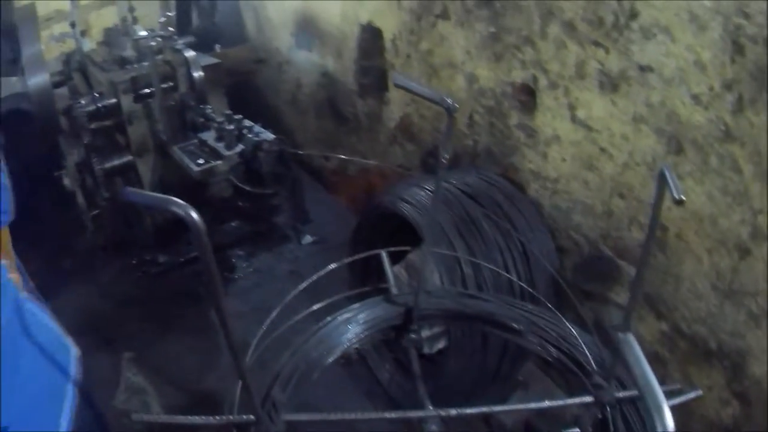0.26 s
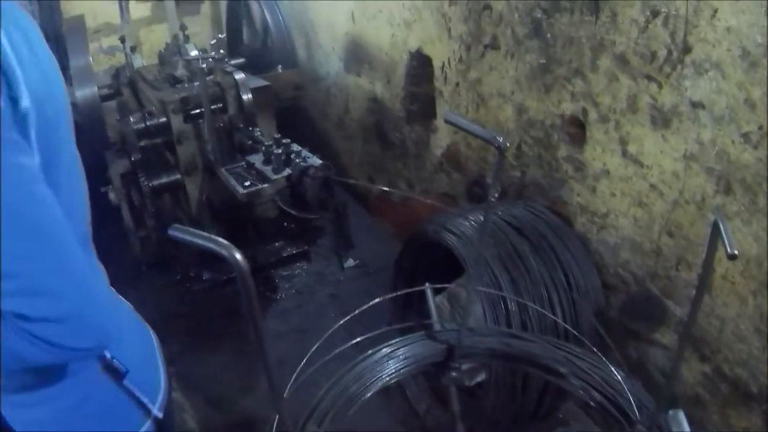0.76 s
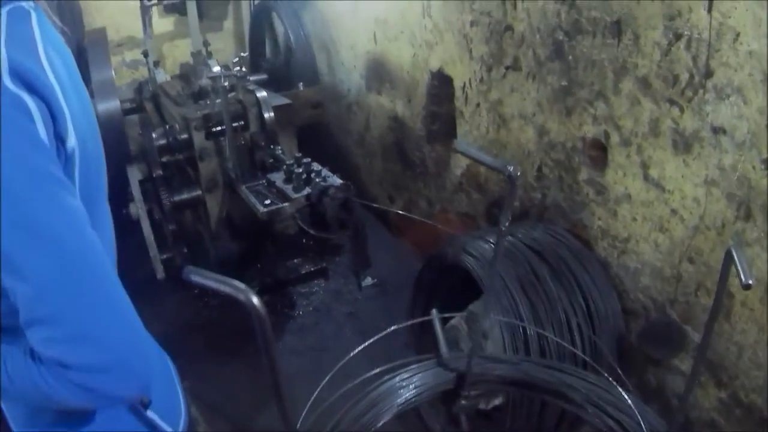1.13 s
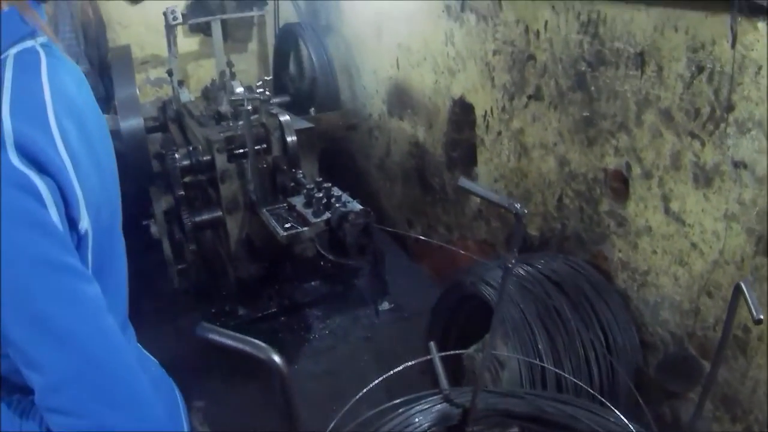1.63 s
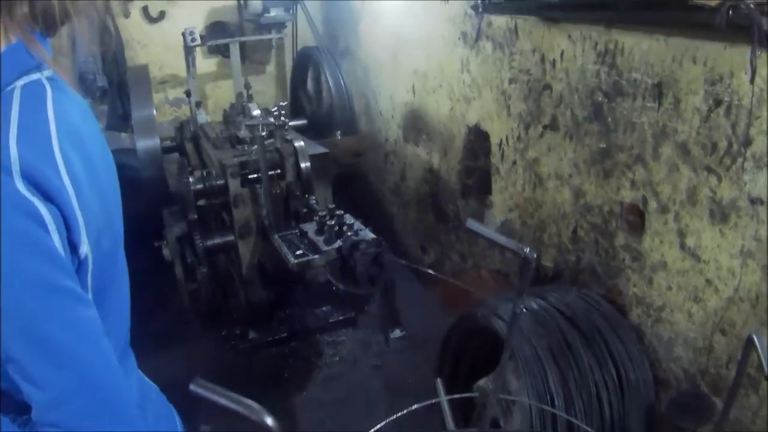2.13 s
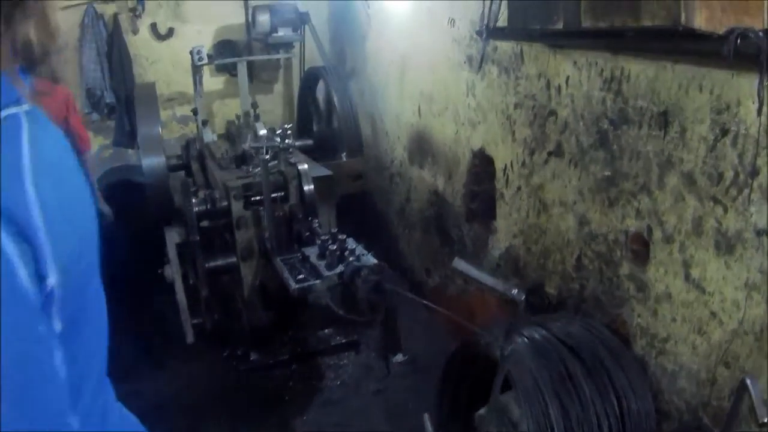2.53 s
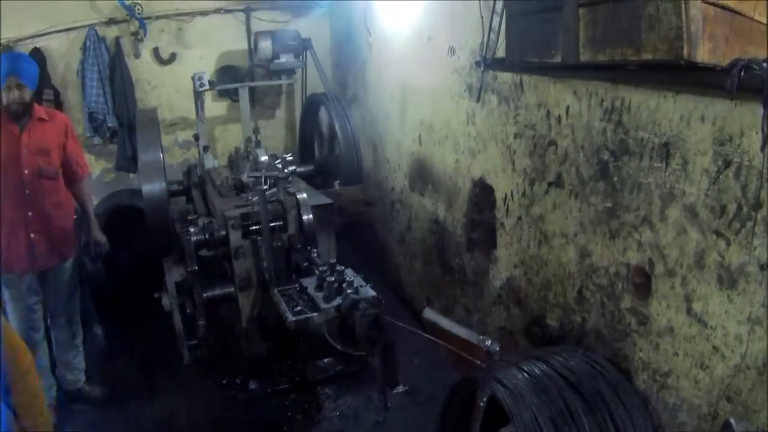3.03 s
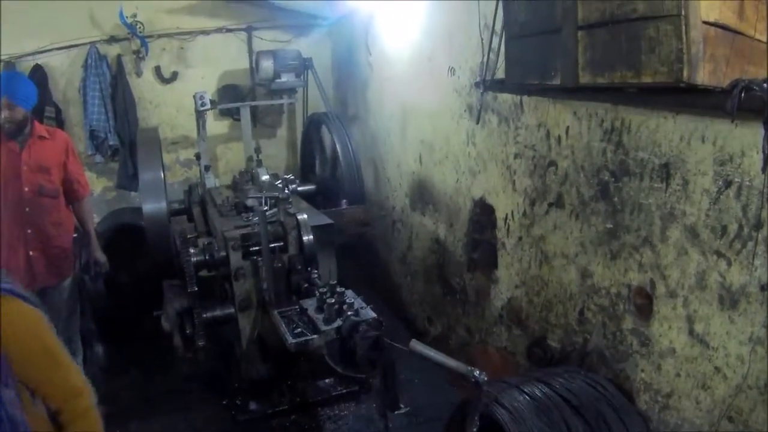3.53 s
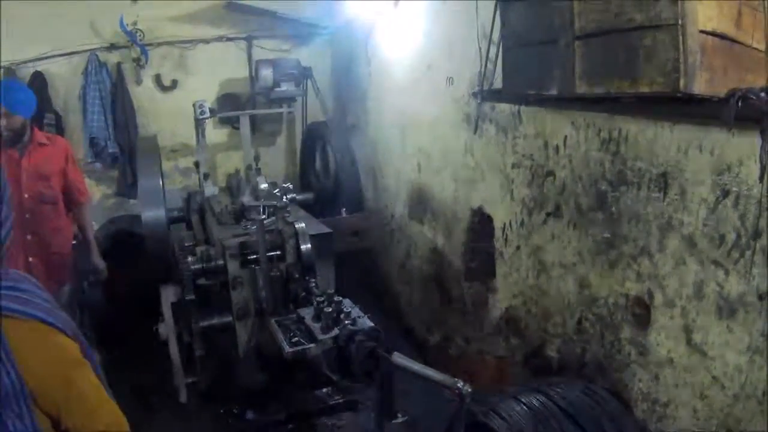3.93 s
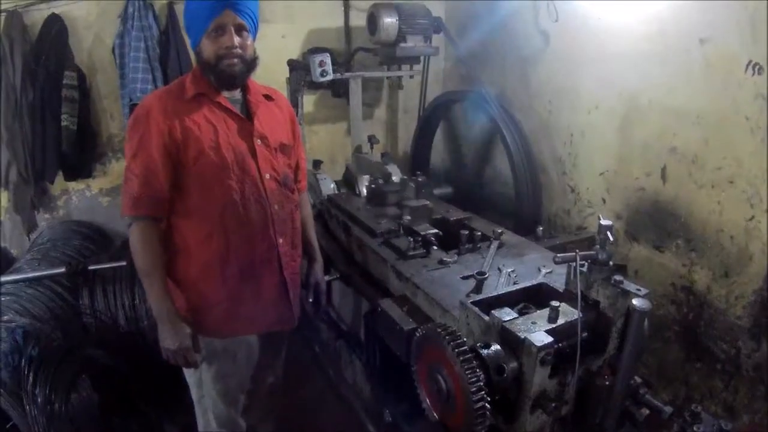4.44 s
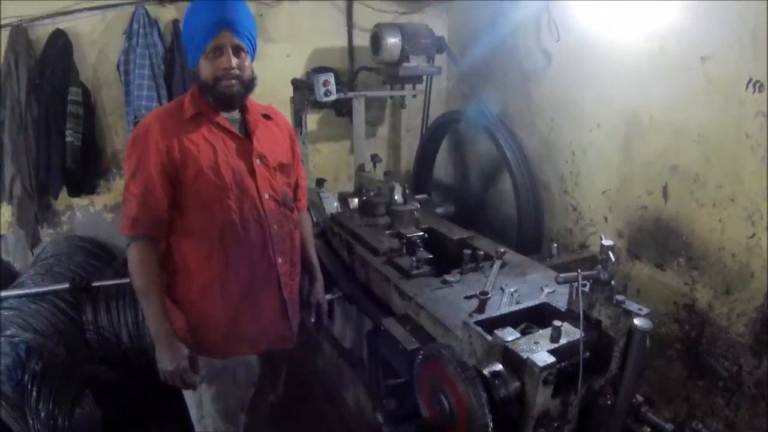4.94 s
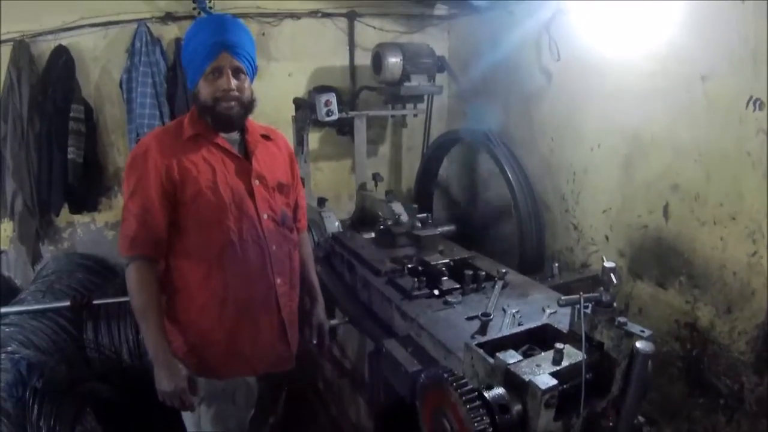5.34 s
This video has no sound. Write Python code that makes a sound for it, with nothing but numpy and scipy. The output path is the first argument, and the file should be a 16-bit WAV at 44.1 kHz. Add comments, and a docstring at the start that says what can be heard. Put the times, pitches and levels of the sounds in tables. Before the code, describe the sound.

In a small bare-walled workshop, a wire-working machine runs steadily. Sharp steel clacks, ringing punches and heavier ram thuds repeat in a turn of about one and a half seconds, over continuous gear rattle. Just after four seconds a cut skips part of a turn and the level drops, recovering partly. A hand-held phone picks it up, with occasional dull finger taps, short echoes and low rumble.

```python
"""In a small hard-walled workshop, a wire-fed double-stroke header clatters near a hand-held phone.
Its parts clack in much the same order each turn: bursts of noise crack and ring the steel tooling.
Ram strokes shake the cast frame and its bed plate, and the gears rattle in a pattern every turn.
About four seconds in, a cut in the sound skips part of a turn; the level drops and comes part way back.
Echoes, a low rumble and faint hiss lie behind; fingers tap the phone case now and then."""
import sys
import numpy as np
from scipy import signal
from scipy.fft import rfft, irfft, next_fast_len
from scipy.io import wavfile
from scipy.ndimage import uniform_filter1d

SR = 44100
rng = np.random.default_rng(int(sys.argv[2]) if len(sys.argv) > 2 else 0)


def persist_wave(psi):
    """Save psi, clipped to +-1, as 16-bit WAV."""
    counts = np.round(np.clip(psi, -1, 1) * 32767).astype(np.int16)
    wavfile.write(sys.argv[1], SR, np.atleast_2d(counts).T)


N = 246519  # length in samples
JUMP_S = 4.066  # when a cut in the sound skips part of a turn

# Moving parts, roughly in the order of a turn: (low, middle, high ring [Hz], their three levels [dB],
# dull crack level [dB], bright crack level [dB], t60 [s] before limits, first snap level [dB],
# bounce delay [s] before limits, bounce level [dB]); t60 is the time to fade by 60 dB
CUTTER = (2300, 6270, 8140, -5, 2, -8, -7, -16, 0.17, 7, .03, -5)
CUTTER_BACK = (4340, 6280, 9300, 9, 12, -15, 5, 0, 0.35, -2, .021, -6)
FINGER = (4000, 5750, 7830, -15, -12, -13, -8.5, 3.5, 0.3, 1, 3, 1)
LATCH = (4000, 6950, 8700, -32, -1, 5, -10, 0, 0.22, -1, 0.7, -1.5)
PUNCH_1 = (3000, 6300, 8900, -6, -3, -6, -4, -7, -0.02, 5.5, .03, -28)
FEED = (3430, 7603, 9650, -18, -13, -6, 0, -0.5, 0.7, 2, -4, -1)
PAWL = (4020, 5100, 9000, -2, -7, 15, -2, 5.5, 0.46, 7, -0.5, -4)
CLIP = (3998, 7747, 8900, -9, 4.5, 6, -33, 2, 0.3, -5, 2, -12)
PUNCH_2 = (4050, 6950, 7850, -18, -6, -3, -5.5, 2, 0.3, -7, .03, -16)
EJECT = (4050, 6348, 8850, -14, 7, -9, -1, -0.5, 0.09, 2.5, -1.7, 0)
EJECT_BACK = (4200, 7230, 9700, -10, -4, -28, -9, -6, 0.27, 3, 0.8, 0)
# The second punch as it sounds after the cut, same columns
PUNCH_2_ASIDE = (4052, 6950, 7957, -20, 2, 6, -9, 3, 0.32, 9, .021, -18)
# Small sounds outside that order, same columns
PING = (4340, 6280, 9280, -5, 0.1, 15, -31, -14, 0.2, -6, .02, -20)
SLIDE = (3000, 4010, 4340, -9, 0, -18, -13, 4, -0.26, 3, 0.7, 0)
TICK = (4020, 5100, 14700, -10.5, -1.2, 5, -15, 4, 0.02, -8, .02, -20)
THIN_PING = (3900, 7850, 13450, -4, 0.1, 16, -3, -12, 0.02, -6, .02, -20)
# The second blow of the first punch, same columns
PUNCH_1_AGAIN = (4340, 6300, 10800, 0, -5, -5, 5.5, -1, 0.18, 5, .03, -15)
# Steel hitting steel: (time [s], level [dB], part)
CLACKS = [(0.0847, -13, CUTTER), (0.1226, -24, PING), (0.2803, -17.5, FINGER), (0.2825, -33, PING),
          (0.412, -26, PAWL), (0.449, -13.5, LATCH), (0.4798, -8, PUNCH_1), (0.4935, -14.5, PUNCH_1_AGAIN),
          (0.6186, -30, PAWL), (0.68, -25, SLIDE), (0.7194, -35, THIN_PING), (0.7475, -16, FINGER),
          (1.004, -39, TICK), (1.091, -31.5, TICK), (1.1752, -7.5, PUNCH_2), (1.334, -20, SLIDE),
          (1.362, -12, EJECT), (1.4088, -8.5, EJECT_BACK), (1.5437, -12, CUTTER),
          (1.5677, -24, CUTTER_BACK), (1.744, -11, FINGER), (1.8177, -23, CLIP), (1.905, -15, LATCH),
          (1.926, -10.5, PUNCH_1), (1.943, -16, PUNCH_1_AGAIN), (2.111, -21, FEED), (2.4056, -20.5, CLIP),
          (2.424, -28, CLIP), (2.5181, -33, PAWL), (2.5786, -17, FINGER), (2.628, -10.5, PUNCH_2),
          (2.6865, -22, SLIDE), (2.7514, -22, SLIDE), (2.81, -12, EJECT), (2.8671, -8.5, EJECT_BACK),
          (2.9872, -9, CUTTER), (3.012, -28.5, CUTTER_BACK), (3.1825, -14, FINGER), (3.192, -23, SLIDE),
          (3.358, -15.5, LATCH), (3.379, -11, PUNCH_1), (3.396, -14.5, PUNCH_1_AGAIN), (3.425, -26.5, PAWL),
          (3.564, -15.5, FEED), (3.758, -25, PAWL), (4.0428, -19, FEED), (4.136, -16, CUTTER_BACK),
          (4.1881, -25.5, PING), (4.304, -16.5, FINGER), (4.339, -11.5, FINGER), (4.508, -11, CLIP),
          (4.536, -7, PUNCH_1), (4.549, -13, PUNCH_1_AGAIN), (4.603, -30, PING), (4.714, -14, FEED),
          (4.92, -22, PAWL), (5.1003, -24, PAWL), (5.235, -11, PUNCH_2_ASIDE), (5.415, -5.5, EJECT),
          (5.443, -12.5, FEED), (5.4687, -6.5, EJECT_BACK)]


def read_clacks():
    """Unpack each clack, keeping its fade and its bounce delay within sensible limits."""
    clacks = []
    for s, level_db, part in CLACKS:
        *struck, dull_db, bright_db, t60, snap_db, bounce, bounce_db = part
        struck_hz, struck_db = np.reshape(struck, (2, 3))
        crack_db = level_db + np.array([dull_db, 0, bright_db, bright_db])  # one per band
        t60, bounce = max(t60, .01), np.clip(bounce, .005, .03)
        clacks.append((s, level_db, struck_hz, struck_db, crack_db, t60, snap_db, bounce, bounce_db))
    return clacks


# Pitches at which the tooling rings: (frequency [Hz])
TOOLING_HZ = [2300, 3000, 3430, 3880, 4020, 4340, 5150, 5750, 6280, 6770, 6965, 7250, 7530, 7830, 8140,
              8800, 9280, 9600, 10200, 10800, 13450, 14720]
# Strength and fade of those rings, in the same order: (level [dB], t60 [s])
TOOLING = [(-7.5, 0.053), (-15.5, 0.072), (-4, 0.05), (-11.5, 0.1), (-11, 0.089), (-11, 0.065),
           (-2.5, 0.018), (-7.5, 0.05), (-10.5, 0.021), (-14, 0.053), (-2, 0.012), (-13, 0.078),
           (-6, 0.065), (-10, 0.091), (-11, 0.078), (-14, 0.015), (-8, 0.025), (-14, 0.034), (-18, 0.046),
           (-12.5, 0.029), (-8, 0.044), (-3, 0.057)]
RING_DB = -12.5
PAIR_SPLIT = 0.013  # each tooling mode has a twin this share higher


def tooling_rings(rattle):
    """A blow and a burst of contacts ring each steel mode, most strongest near the struck part's pitches."""
    hz, (db, t60) = np.array(TOOLING_HZ), np.transpose(TOOLING)
    local = hz[:, None] < 10000  # higher modes ring only when struck close by
    force, blow = np.zeros((len(hz), N)), np.zeros((len(hz), N))
    luck = rng.standard_normal((len(CLACKS), len(hz)))
    for clack, chance in zip(read_clacks(), luck):
        s, level_db, struck_hz, struck_db, _, decay, _, bounce, bounce_db = clack
        distance = np.log(hz[:, None] / struck_hz) / 0.019
        near = np.exp(-distance ** 2) @ undb(struck_db)
        everywhere = undb(-20.0 + 0.7 * chance) * local[:, 0]
        share = undb(level_db + db + RING_DB) * (near + everywhere)
        add(force, s, .010, 0.73 * decay, share)
        blow[:, int(s * SR)] = share * undb(3.5)
        blow[:, int((s + bounce) * SR)] = share * undb(3.5 + bounce_db)  # the part bounces once
    force += rattle * undb(db[:, None] - 15.5) * local
    rings = np.zeros(N)
    for f, b, h, fade in zip(force, blow, hz, t60):
        # a blow takes some milliseconds to build its ring
        drive = chatter(30, 2.8) * f + ring(b, h, .02)
        rings += ring(drive, h, fade) - undb(-9.0) * ring(drive, h * (1 + PAIR_SPLIT), fade)
    return rings


# Tone colour of cracking steel: (frequency [Hz], level [dB per Hz])
CRACK = [(1100, -26), (1700, -13.5), (2300, 3), (2680, -5), (3050, -1), (3650, -2.5), (4000, 1), (4650, -2),
         (5600, -3.5), (7090, -2), (9500, -7), (10700, -10), (11800, -20.5), (15700, -15)]
CRACK_DB = -21


def cracks(rattle):
    """Many tiny steel contacts make a broad crack; a sharp snap marks the first contact and the bounce."""
    crack, snap = np.zeros((4, N)), np.zeros((4, N))
    for s, _, _, _, crack_db, decay, snap_db, bounce, bounce_db in read_clacks():
        colours = undb(crack_db + CRACK_DB)
        add(crack, s, .013, decay, colours)
        add(snap, s, .006, .045, colours * undb(snap_db))
        add(snap, s + bounce, .005, .045, colours * undb(snap_db + bounce_db))
    contacts = colour(chatter(120, 1.76), CRACK)
    contacts = contacts + undb(-6.5) * jingle(count=1800, low_hz=2398, high_hz=15190, t60=0.088,
                                              scatter_db=12.5, spectrum=CRACK)
    contacts = contacts + undb(-10.0) * jingle(count=600, low_hz=4960, high_hz=14750, t60=0.083,
                                               scatter_db=7.5, spectrum=CRACK)
    contacts = patchy(contacts, size=512, width_hz=260, hold_s=.025, depth_db=4.5)
    crack = crack * [flicker(24.57, depth_db) for depth_db in (0.85, 2.2, 2.1, 2.3)]
    gear_contacts = rattle * undb([[-7.0], [-7.0], [-7.0], [-10.5]])
    # equal first edges leave the second band silent
    cracking = (crack + gear_contacts) * split(contacts, 6800, 6800, 14000)
    snaps = snap * split(colour(rng.standard_normal(N), CRACK), 7500, 7800, 13000)
    return undb(2.0) * np.sum(snaps, axis=0) + np.sum(cracking, axis=0)


# How a stroke or knock shakes the frame: (rise [s], t60 [s], bass level [dB] before STROKE_BASS_DB)
FIRST = (0.061, 0.4, -15)
SECOND = (0.055, 0.39, -15.5)
RECOIL = (0.029, 0.42, -17)
KNOCK = (0.044, 0.52, -41)
# The two strokes as they sound after the cut, same columns
FIRST_ASIDE = (0.072, 0.42, -8)
SECOND_ASIDE = (0.046, 0.48, -8.5)
# Ram strokes and their after-knocks: (time [s], level [dB], kind)
STROKES = [(0.0, -25.5, RECOIL), (0.519, -13, FIRST), (0.61, -25.5, RECOIL), (0.75, -31, KNOCK),
           (1.243, -8, SECOND), (1.359, -25, RECOIL), (1.549, -35, KNOCK), (1.973, -13.5, FIRST),
           (2.24, -32, KNOCK), (2.334, -33, KNOCK), (2.701, -11, SECOND), (2.809, -25, RECOIL),
           (3.419, -13.5, FIRST), (3.528, -25, RECOIL), (3.759, -52, KNOCK), (4.575, -14.5, FIRST_ASIDE),
           (4.659, -33, RECOIL), (5.298, -13, SECOND_ASIDE), (5.37, -31, RECOIL), (5.449, -34, KNOCK)]
STROKE_DB, STROKE_BASS_DB = -15, 13
# Single hard knocks on the frame: (time [s], level [dB])
KNOCKS = [(0.083, -22), (0.28, -22), (0.475, -19), (0.527, -11), (0.538, -18), (0.612, -23), (0.75, -27),
          (1.247, -12), (1.384, -22), (1.407, -21), (1.469, -21), (1.578, -19), (1.946, -20.5),
          (1.979, -20), (2.336, -19), (2.502, -25), (2.667, -17), (2.713, -11), (2.737, -21), (3.34, -33),
          (3.426, -15), (3.528, -23), (3.709, -31), (3.762, -22), (4.537, -27), (4.552, -20), (4.574, -13),
          (4.602, -19), (4.624, -19), (5.305, -16), (5.356, -18), (5.383, -19)]
KNOCK_RISE_S, KNOCK_T60_S, KNOCK_RMS_DB = 0.0013, 0.05, -17
# Tone colour of the cast frame: (frequency [Hz], level [dB per Hz])
FRAME = [(35, -27), (60, -22.5), (119, -18), (201, -14), (281, -7.5), (432, -10), (720, -8), (844, -8.5),
         (1050, -5.5), (1450, 1), (2130, -8), (2340, -11.5), (2700, -21.5), (3510, -17.5), (5940, -120)]
# Low modes of the bed plate: (frequency [Hz], level [dB], t60 [s])
BED = [(119.3, -20.5, 0.49), (274, -23, 0.12), (731, -19, 0.077), (1088, -7.5, 0.025), (1160, -22.5, 0.18),
       (1444, -16, 0.13), (1686, -13.5, 0.097)]
ASIDE_BED_DB = -10.5  # the lowest bed mode is weaker after the cut


def frame(rattle_db, bright_db):
    """The casting has too many modes to tell apart, the bed plate a few; strokes shake both."""
    shake = np.zeros((2, N))  # bass, and everything above
    for s, level_db, (rise, decay, bass_db) in STROKES:
        bands_db = np.array([bass_db + STROKE_BASS_DB, 0])
        add(shake, s, rise, decay, undb(level_db + STROKE_DB + bands_db))
    for s, level_db in KNOCKS:
        add(shake[1], s, KNOCK_RISE_S, KNOCK_T60_S, undb(level_db + KNOCK_RMS_DB))
    shake = shake * [flicker(45, 1.8), flicker(70, 1.0)]  # each stroke lands as several uneven knocks
    knocks = chatter(180, 1.18)
    covers = jingle(count=500, low_hz=600.0, high_hz=2379, t60=0.089, scatter_db=2.5, spectrum=FRAME)
    casting = colour(knocks, FRAME) + undb(-6.5) * covers
    casting = patchy(casting, size=1024, width_hz=90, hold_s=.09, depth_db=1.27)
    bass, middle, upper = split(casting, 760, 1090)
    aside = undb(ASIDE_BED_DB * (np.arange(N) > JUMP_S * SR))
    plate = np.zeros(N)
    for hz, db, t60 in BED:
        push = knocks * shake[int(hz > 500)] * (aside if hz < 200 else 1)
        plate += undb(db) * ring(push, hz, t60)
    bands = [bass, middle + undb(bright_db) * upper]
    gear_shake = undb(rattle_db + np.array([[-3.0], [-1.5]]))
    return plate + np.sum((shake + gear_shake) * bands, axis=0)


# Hard first contacts that sing short and high: (time [s], level [dB], ring [Hz])
PINGS = [(0.0857, -12.5, 6290), (0.1052, -13.5, 6290), (0.282, -21, 9320), (0.4499, -12, 6950),
         (0.4798, -15, 6300), (0.493, -15, 6300), (0.494, -19, 10700), (4.549, -21, 10700),
         (4.517, -25, 7900), (1.178, -8.5, 6940), (1.3663, -17, 6350), (1.5693, -17, 6230),
         (1.906, -13, 6930), (1.9184, -17, 6900), (2.6314, -17, 6830), (2.814, -18, 6620),
         (2.9896, -25, 6180), (3.0134, -17, 6210), (3.379, -9, 6250), (3.3974, -20, 6300),
         (4.1554, -21, 6340), (4.5356, -10.5, 6290), (5.237, -9, 7960)]
PING_RISE_S, PING_T60_S, PING_RMS_DB = 0.0035, 0.039, -10.5


def pings():
    """Hard steel contacts ring as very short pairs of close tones."""
    events = [(s + PING_RISE_S / 2, hz, db + PING_RMS_DB) for s, db, hz in PINGS]
    return beating_tones(events, PING_RISE_S, PING_T60_S)


# Single parts that ring out clearly: (time [s], ring [Hz], level [dB])
CLINKS = [(.120, 4310, -33.5), (.254, 3000, -44), (.285, 14800, -42), (.362, 3910, -40), (.430, 3930, -46),
          (.635, 14800, -50), (.703, 3910, -31), (.764, 4030, -45), (.804, 3430, -41), (1.339, 2990, -40),
          (1.386, 3000, -38), (1.453, 3080, -36), (1.507, 3880, -47), (1.549, 2384, -34.5),
          (1.644, 4320, -38), (1.689, 3880, -37), (1.735, 13400, -40), (1.81, 14550, -52.5),
          (1.82, 2990, -38), (1.861, 2980, -38), (1.957, 4300, -36), (1.96, 3480, -34), (1.98, 2350, -39),
          (2.406, 3980, -40), (2.522, 4330, -43), (3.001, 3870, -36), (3.052, 2950, -47),
          (3.101, 3420, -39), (3.154, 5100, -42), (3.195, 2980, -36), (3.207, 4000, -28),
          (3.245, 3010, -40.5), (3.341, 1920, -36.5), (3.567, 3400, -37), (3.683, 1927, -35),
          (3.759, 2390, -35), (4.155, 3850, -32), (4.36, 7750, -38), (4.538, 1940, -32.5),
          (4.555, 1920, -31), (4.552, 3900, -28), (4.719, 1930, -29), (4.733, 3910, -34),
          (4.927, 1940, -28), (5.04, 1930, -30.5), (5.319, 3030, -32), (5.411, 1930, -24),
          (5.42, 5160, -26), (5.422, 4320, -37), (5.493, 3020, -40)]


def clinks():
    """Single steel parts ring as pairs of close tones that fade a little more slowly than the pings."""
    return beating_tones(CLINKS, rise=0.0082, t60=0.09)


# Parts that keep ringing roughly while shaken: (time [s], ring [Hz], level [dB], shaking t60 [s])
SINGS = [(.09, 8200, -41, 0.26), (.125, 6250, -36, 0.36), (.3, 4000, -42.5, .6), (.62, 7600, -36, .2),
         (.52, 4340, -34, .3), (.62, 3900, -42, 0.62), (1.33, 3000, -38, 0.53), (1.55, 4320, -33, .4),
         (1.56, 3930, -39, 0.46), (2.675, 3020, -32, 0.3), (2.681, 3910, -35, 0.24),
         (2.755, 3030, -35, 0.41), (2.819, 3960, -38, 0.31), (2.84, 3070, -35, 0.65),
         (2.925, 3000, -39, 0.26), (3.02, 6280, -36, 0.35), (3.02, 4350, -39, .4), (3.2, 3030, -39, .5),
         (3.41, 6340, -39, 0.34), (4.15, 4340, -42, .3), (4.355, 7850, -38, .5), (4.55, 3930, -40, .5),
         (4.56, 6260, -39, .4), (5.25, 3950, -36, .3), (5.26, 7040, -38, .4), (4.2, 2230, -39, .4),
         (4.3, 3070, -43, 0.7), (4.35, 1667, -28.5, .4), (4.37, 3900, -43, .5), (4.7, 3950, -42, .6),
         (4.92, 3920, -41, 0.98), (4.92, 1500, -32, .6), (5.04, 3900, -39, .5)]
SING_RISE_S, SING_RING_S = 0.0096, 0.046


def sings():
    """Bursts of rattle, made of noise, drive one narrow mode each."""
    out = np.zeros(N)
    for s, hz, db, t60 in SINGS:
        push = np.zeros(N)
        add(push, s, SING_RISE_S, t60, undb(db))
        end = min(int((s + t60 + SING_RING_S) * SR), N)
        span = slice(int((s - SING_RISE_S) * SR), end)
        noise = rng.standard_normal(2 * SR)[:span.stop - span.start]
        out[span] += ring(push[span] * noise, hz, SING_RING_S)
    return out


# Ringing of a guard plate: (frequency [Hz], level [dB], t60 [s])
GUARD = [(3900, -15, 0.02), (4054, -18.5, 0.022), (3005, -25, .07)]


def guard_plate(rattle):
    """The gear rattle keeps a guard plate ringing in a few modes."""
    return rattle * sum(undb(db) * ring(chatter(15, 6.9), hz, t60) for hz, db, t60 in GUARD)


# Gear rattle through one turn: (time into the turn [s], frame level [dB], tooling level [dB])
RATTLE = [(0.0, -31.5, -30), (0.3, -33.5, -31.5), (0.47, -35, -33), (0.68, -34.5, -33),
          (0.85, -31.5, -32.5), (1.05, -38, -40), (1.19, -39, -41), (1.26, -37.5, -28.5), (1.34, -34, -31),
          (1.41, -29.5, -21)]
TURN_S, SKIP_S = 1.453, .303


def gear_rattle(t):
    """The gears rattle by the same pattern every turn; a cut skips part of one."""
    turn = (t + SKIP_S * (t > JUMP_S)) % TURN_S
    return curves(RATTLE + [(TURN_S, *RATTLE[0][1:])], turn)  # the end joins the start


# Finger taps on the phone: (time [s], level [dB] before TAP_DB)
TAPS = [(1.821, -41), (2.589, -25), (3.253, -19), (3.378, -20.5), (3.809, -39), (4.03, -32), (4.065, -30)]
TAP_DB = 28


def taps():
    """Short pushes on the phone case, heard as dull ticks."""
    push = np.zeros(N)
    for s, level_db in TAPS:
        push[int(s * SR)] = undb(level_db + TAP_DB)
    return signal.sosfilt(signal.butter(2, (120, 1100), "band", fs=SR, output="sos"), push)


ROOM_T60_S, ROOM_DB = 0.71, -10.5


def room(x):
    """Dense echoes from the bare walls, duller as they die."""
    t = np.arange(int(ROOM_T60_S * SR)) / SR
    noise = rng.standard_normal(len(t))
    dull = signal.sosfilt(signal.butter(1, 3000, fs=SR, output="sos"), noise)
    bright = (noise - dull) * undb(-40 * t / ROOM_T60_S)  # the treble dies sooner
    tail = (dull + bright) * undb(-60 * t / ROOM_T60_S) * (t > .004)
    return signal.fftconvolve(x, tail / np.sqrt(np.sum(tail ** 2)))[:N]


# Tone colour of the floor rumble: (frequency [Hz], level [dB per Hz])
RUMBLE = [(15, -5), (28, -2), (40, 1), (70, -7), (120, -1), (170, -6)]


def floor_rumble(level_db):
    """Low noise from the floor, with a slowly changing level."""
    return undb(level_db) * colour(rng.standard_normal(N), RUMBLE)


def undb(db):
    """dB to gain."""
    return 10 ** (np.asarray(db) / 20)


def unit(x):
    """Scale to rms 1."""
    return x / np.sqrt(np.mean(x ** 2))


def colour(x, spectrum):
    """Filter with unit noise gain by (Hz, dB) points."""
    size = next_fast_len(N)
    hz, db = np.transpose(spectrum)
    bins_hz = np.arange(size // 2 + 1) * SR / size
    gain = undb(np.interp(np.log(bins_hz + 1), np.log(hz), db, left=-80, right=-80))
    return irfft(rfft(x, size) * unit(gain), size)[:N]


def chatter(rate, scatter_db):
    """Noise whose level jumps about rate times a second: loose parts knocking."""
    hold = int(SR / rate)
    jumps = np.minimum(rng.exponential(size=N // hold + 1), 3)
    level = uniform_filter1d(np.repeat(undb(scatter_db * jumps), hold), hold)[:N]
    return unit(rng.standard_normal(N) * level)


def flicker(rate, depth_db):
    """A gain that wanders about rate times a second."""
    hold = int(SR / rate)
    steps = np.repeat(rng.standard_normal(N // hold + 1), hold)
    return unit(undb(depth_db * uniform_filter1d(steps, hold)[:N]))


def ring(x, hz, t60):
    """One mode, unit noise gain."""
    r = np.exp(-np.log(1000) / (t60 * SR))
    poles = [1, -2 * r * np.cos(2 * np.pi * hz / SR), r * r]
    return signal.lfilter([1, 0, -1], poles, x) * np.sqrt((1 - r * r) / 2)


def add(track, s, rise, t60, gain):
    """Add a swell that builds up around s and dies away; gain may be one value a row."""
    t = np.arange(int(SR * (rise + t60))) / SR
    swell = np.sin(np.pi / 2 * np.minimum(t / rise, 1)) ** 2
    shape = swell * undb(-60 * np.maximum(t - rise, 0) / t60)
    start = int((s - rise / 2) * SR)
    a, b = max(start, 0), min(start + len(t), N)
    track[..., a:b] += np.multiply.outer(gain, shape[a - start:b - start])


def beating_tones(events, rise, t60):
    """A quick swell and ring of two close tones that beat, for each (s, Hz, dB) event."""
    out, t = np.zeros(N), np.arange(N) / SR
    for (s, hz, db), (phase, twin_phase, split_by) in zip(events, rng.random((len(events), 3))):
        span = slice(max(int((s - rise) * SR), 0), int((s + rise + t60) * SR))
        shape = np.zeros(N)
        add(shape, s - rise / 2, rise, t60, undb(db) * np.sqrt(2))
        twin_hz = hz + 68 * (2 * split_by - 1)  # up to 68 Hz away
        tone = np.sin(2 * np.pi * (hz * t[span] + phase))
        twin = undb(-8) * np.sin(2 * np.pi * (twin_hz * t[span] + twin_phase))
        out[span] += shape[span] * (tone + twin)
    return out


def jingle(count, low_hz, high_hz, t60, scatter_db, spectrum):
    """Loose parts touch at random: short rings of any pitch in a range."""
    out, t = np.zeros(N), np.arange(int(.07 * SR)) / SR
    swell = (1 - np.exp(-t / .002)) * np.cos(np.pi / 2 * t / t[-1])
    for at, pitch, size, length in rng.random((count, 4)):
        hz = low_hz * (high_hz / low_hz) ** pitch
        fade = np.log(1000) / (t60 * (.5 + length))
        tone = np.exp((2j * np.pi * hz - fade) * t).imag
        start = int(at * (N - len(t)))
        out[start:start + len(t)] += undb(scatter_db * size) * np.sqrt(hz) * swell * tone
    return unit(colour(out, spectrum))


def patchy(x, size, width_hz, hold_s, depth_db):
    """Narrow bands swell and sink at random, each on its own."""
    cells = signal.stft(x, nperseg=size)[2]
    bins, frames = max(int(width_hz * size / SR), 1), max(int(hold_s * SR * 2 / size), 1)
    luck = uniform_filter1d(rng.standard_normal(cells.shape), bins, axis=0)
    luck = uniform_filter1d(luck, frames, axis=1)
    return unit(signal.istft(cells * undb(depth_db * unit(luck)), nperseg=size)[1][:N])


def split(x, *edges_hz):
    """Bands that add up to x again."""
    lows = [signal.sosfiltfilt(signal.butter(2, hz, fs=SR, output="sos"), x) for hz in edges_hz]
    return np.diff([0 * x, *lows, x], axis=0)


def curves(table, t):
    """Columns of a table joined by straight lines, read at the times t."""
    s, *columns = np.transpose(table)
    return [np.interp(t, s, c) for c in columns]


# Slow changes in level and brightness: (time [s], frame rattle level [dB], tooling rattle level [dB],
# floor rumble level [dB], level of the frame above about 1.1 kHz [dB])
SLOW_CHANGES = [(0.0, -3, 2, -56, 0.5), (0.3, -1.5, -2.1, -64, 0), (0.7, -2, 4, -63, -0.5),
                (0.9, -3, -2.5, -68, 0.5), (1.15, -5, -4.5, -67, -2), (1.6, 0, 2, -62, 1.5),
                (1.9, -0.5, 0.2, -61, 3), (2.2, -2.5, -5, -59, -1.5), (2.45, -1.5, 2.5, -60, -1.5),
                (2.62, 6, 6.5, -58, 2), (2.8, 0.5, 1, -62, -1), (3.25, -2, -3, -62, 1.5),
                (3.7, -1, 0.5, -58, 1), (4.05, 0, -2.5, -57, 0.5), (4.2, 0, -3.5, -56, 4.5),
                (4.5, -4.5, -5.5, -65, 3), (4.95, 1.5, 3, -62, 4.5), (5.25, 1, 3.5, -63, 7.5),
                (5.59, -2, -3.5, -55, 8)]


def scene():
    """Machine, walls, floor rumble and taps."""
    t = np.arange(N) / SR
    frame_db, tooling_db = gear_rattle(t)
    slow_frame_db, slow_tooling_db, rumble_db, bright_db = curves(SLOW_CHANGES, t)
    rattle = undb(tooling_db + slow_tooling_db)
    machine = tooling_rings(rattle) + cracks(rattle) + frame(frame_db + slow_frame_db, bright_db)
    machine = machine + pings() + clinks() + sings() + guard_plate(rattle)
    heard = machine + undb(ROOM_DB) * room(machine) + floor_rumble(rumble_db)
    # the level falls away at the cut and comes part way back: (time [s], level [dB])
    dip_db, = curves([(4.064, 1.5), (4.069, -22), (4.11, -14), (4.17, -7)], t)
    return (heard * undb(dip_db) + taps())[None]


def record(dry):
    """The phone cuts the top steeply, above a trace of converter hiss."""
    top_cut = signal.ellip(12, .2, 80, 15790, fs=SR, output="sos")  # passes up to 15790 Hz
    return signal.sosfilt(top_cut, dry) + undb(-88) * rng.standard_normal(dry.shape)


dry = scene()
out = record(dry)
persist_wave(out)
```